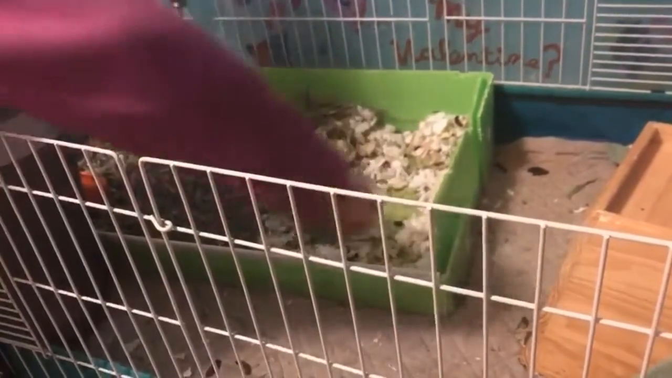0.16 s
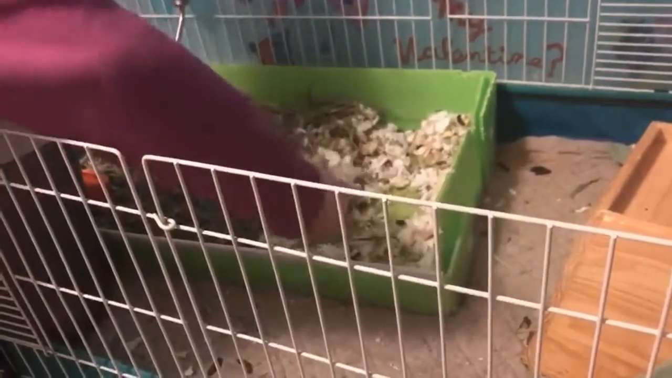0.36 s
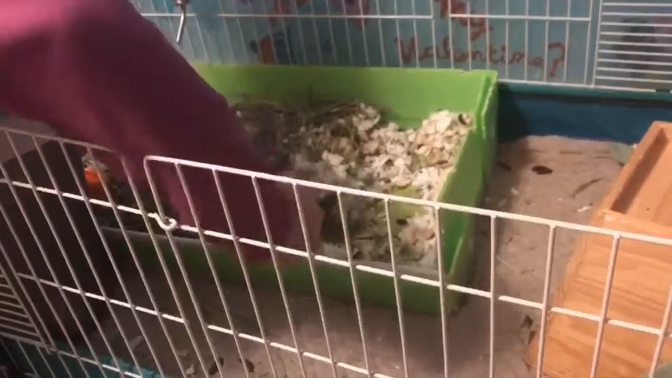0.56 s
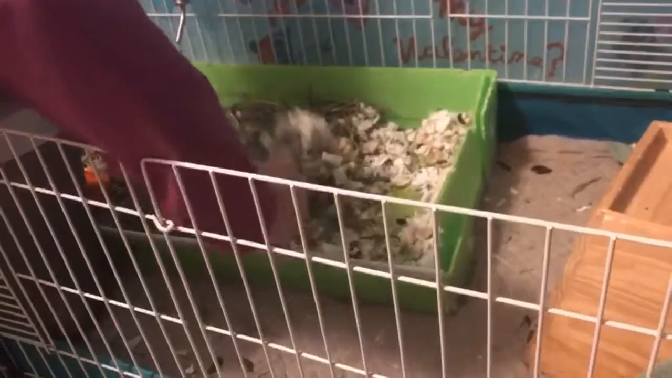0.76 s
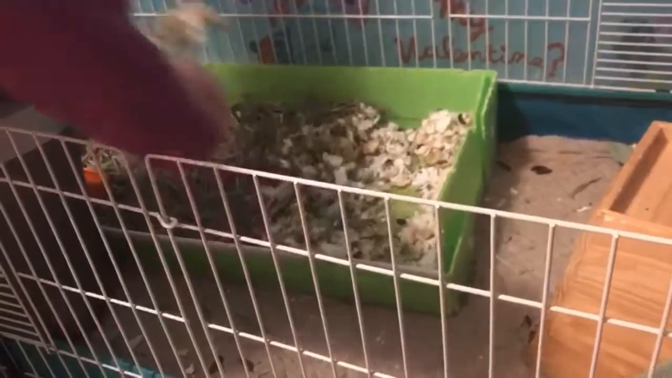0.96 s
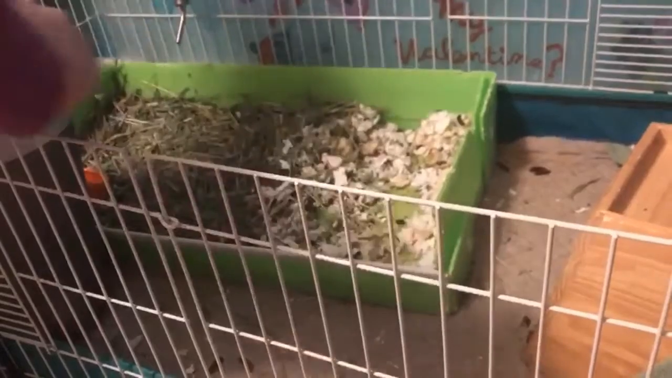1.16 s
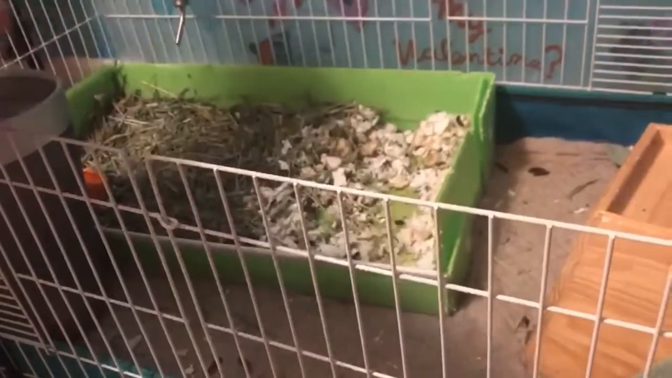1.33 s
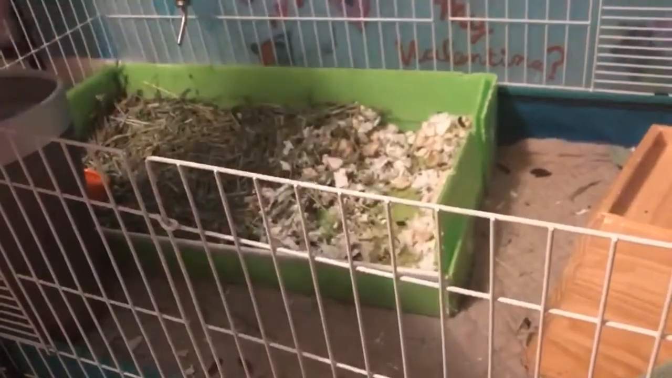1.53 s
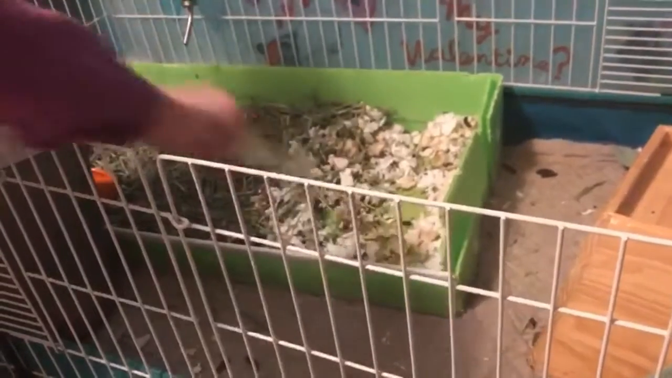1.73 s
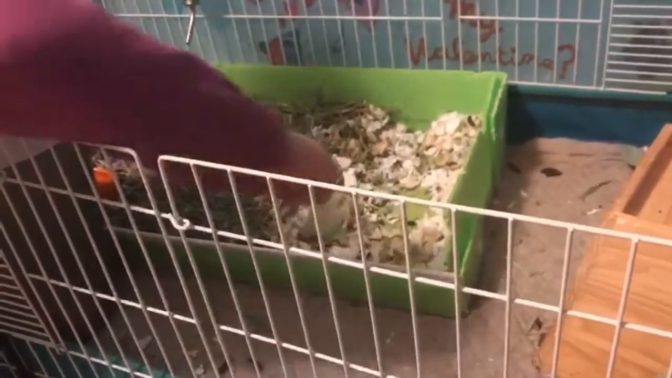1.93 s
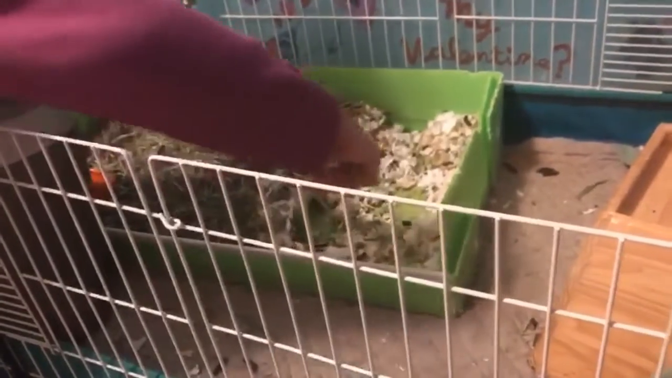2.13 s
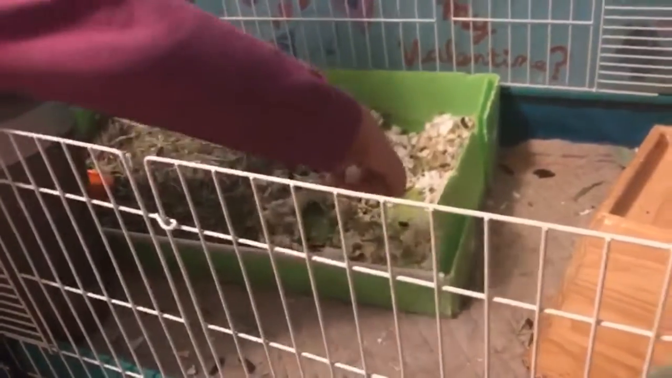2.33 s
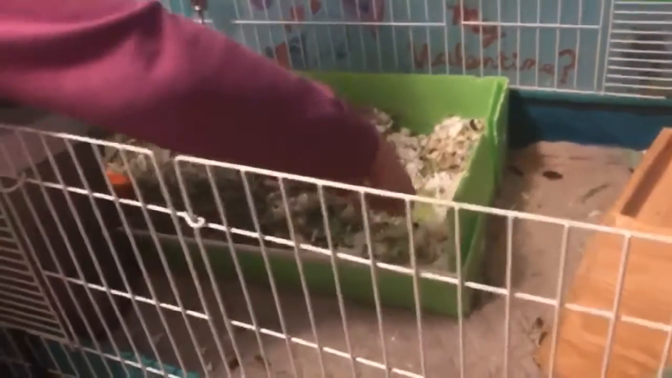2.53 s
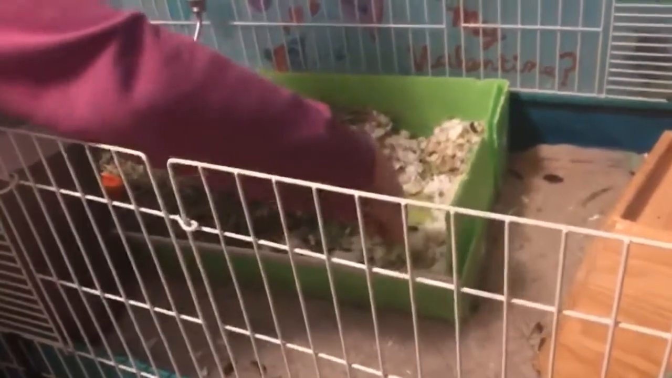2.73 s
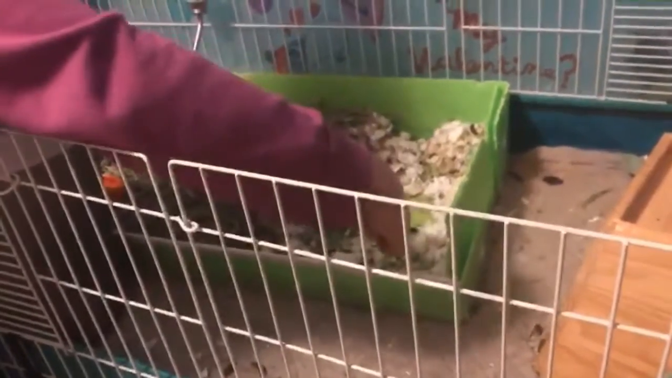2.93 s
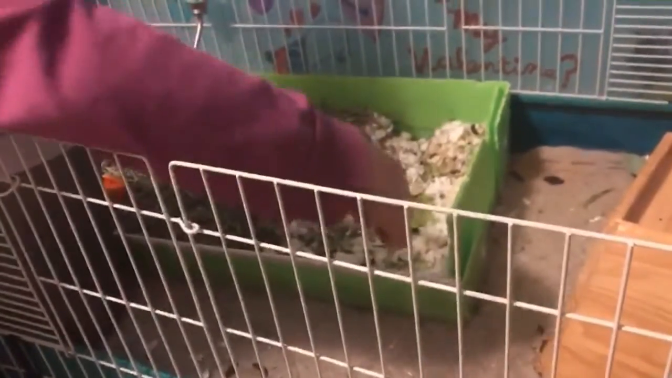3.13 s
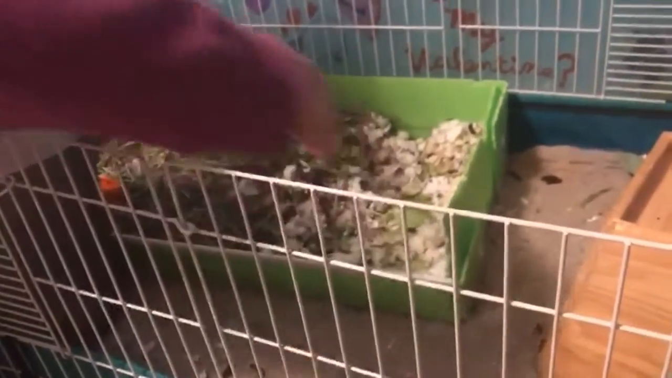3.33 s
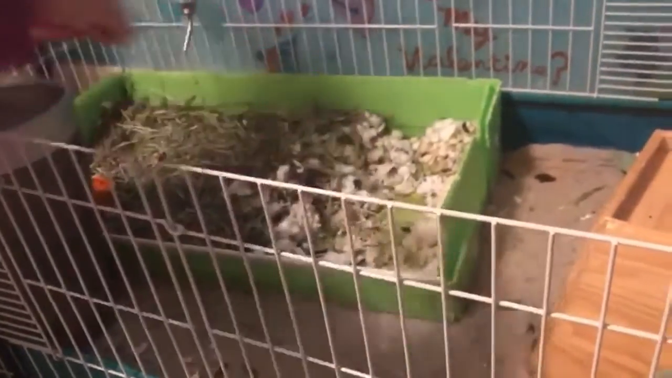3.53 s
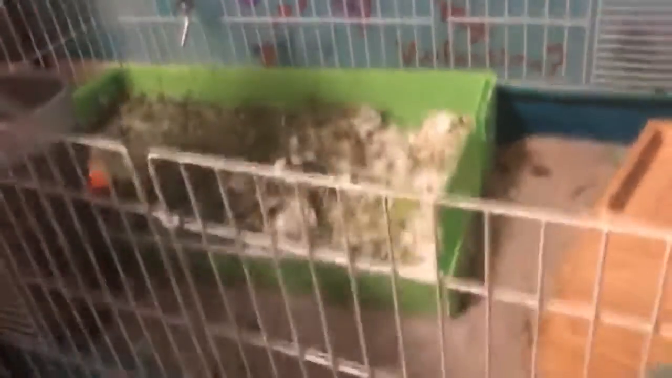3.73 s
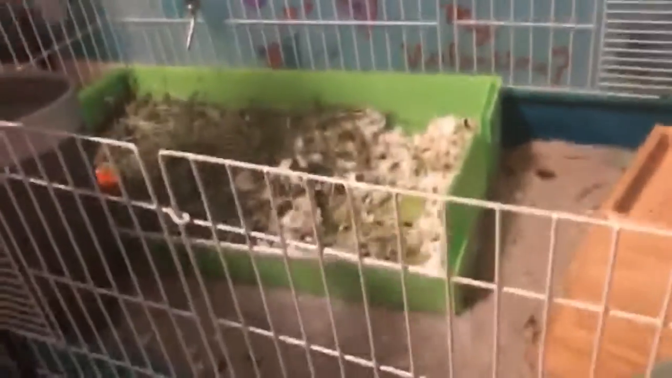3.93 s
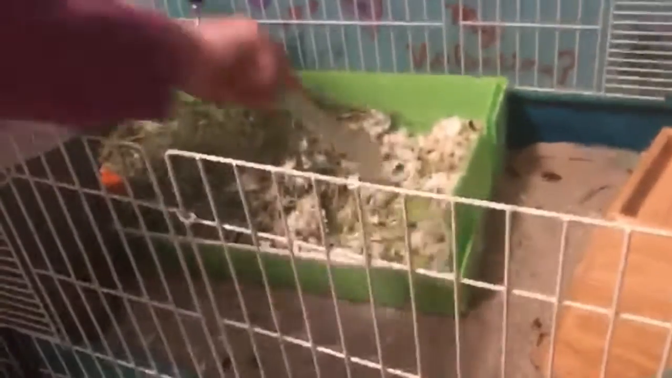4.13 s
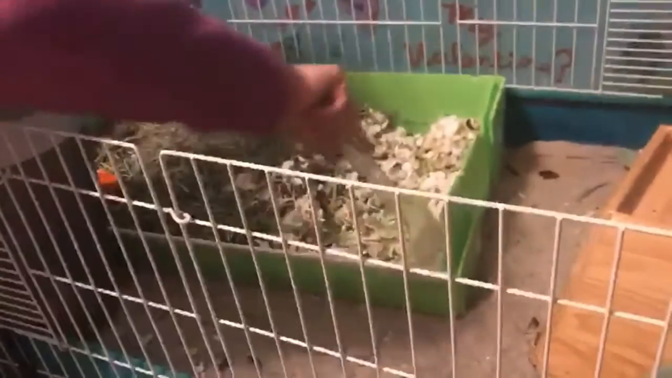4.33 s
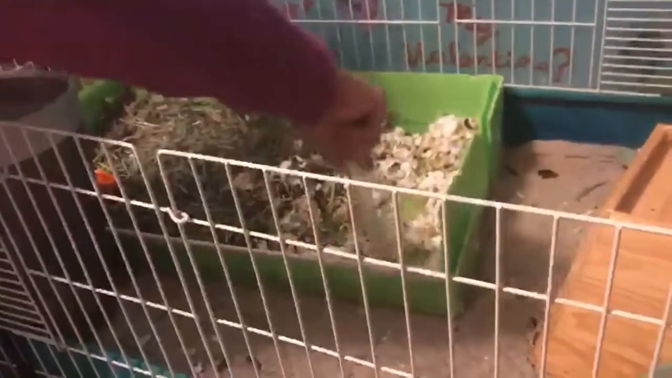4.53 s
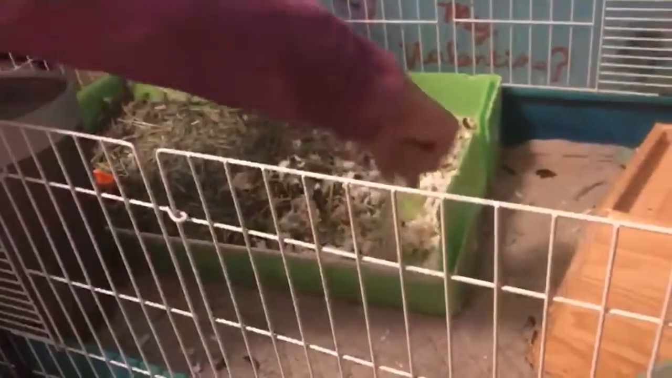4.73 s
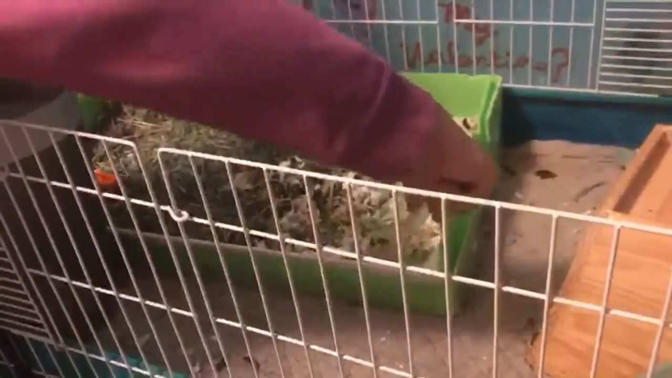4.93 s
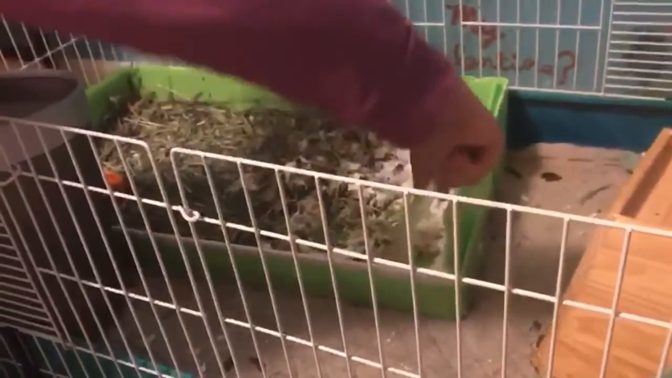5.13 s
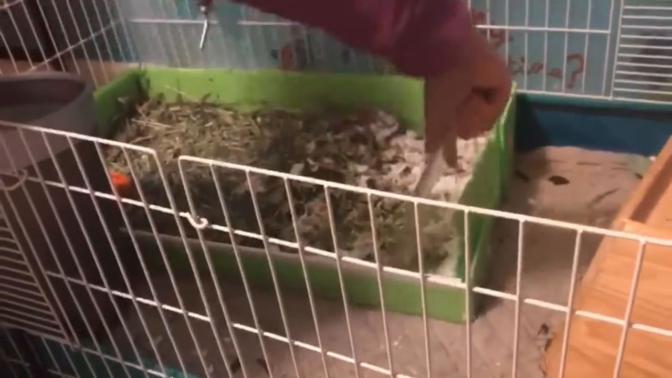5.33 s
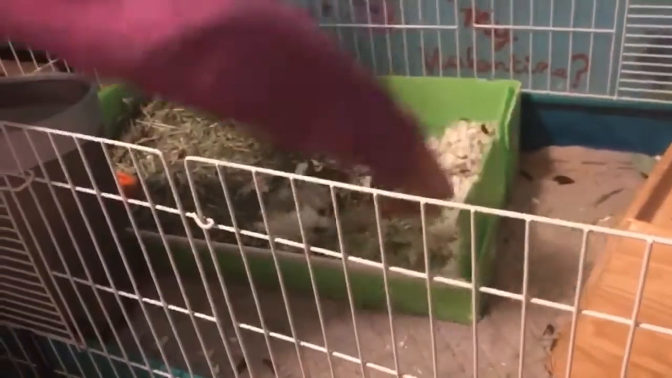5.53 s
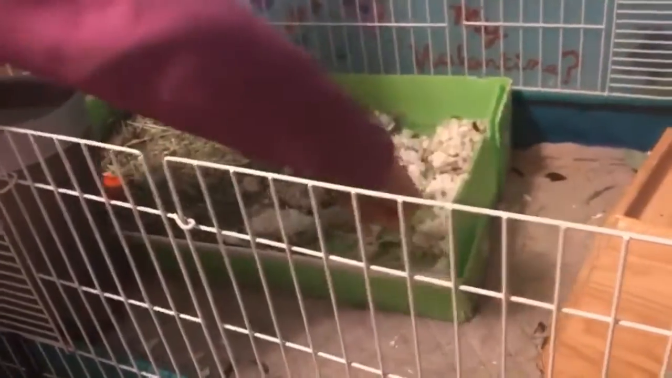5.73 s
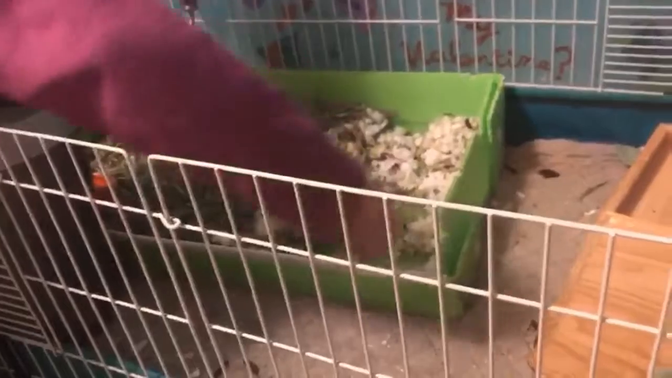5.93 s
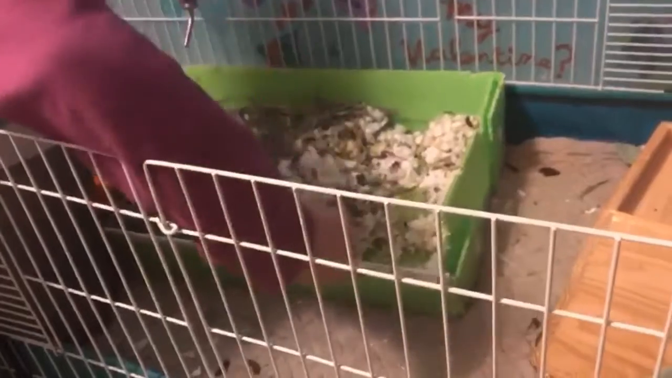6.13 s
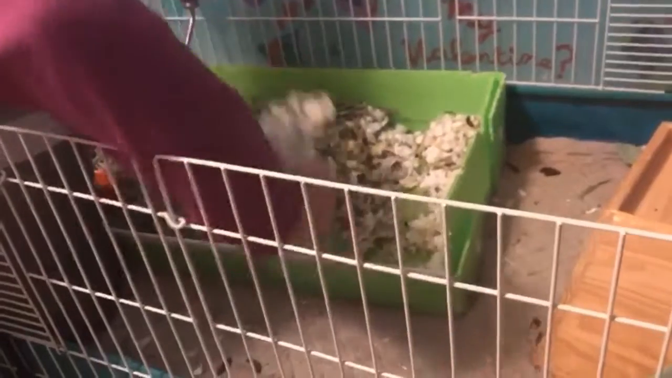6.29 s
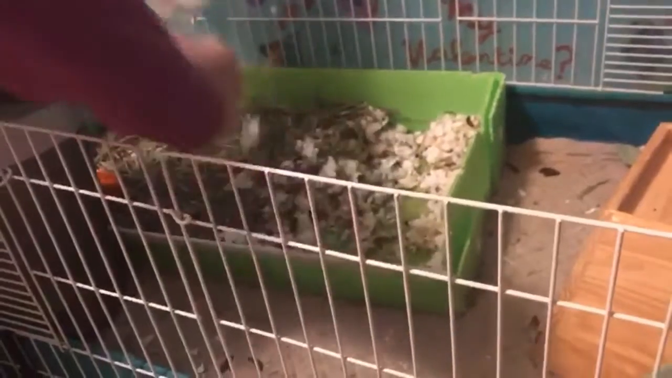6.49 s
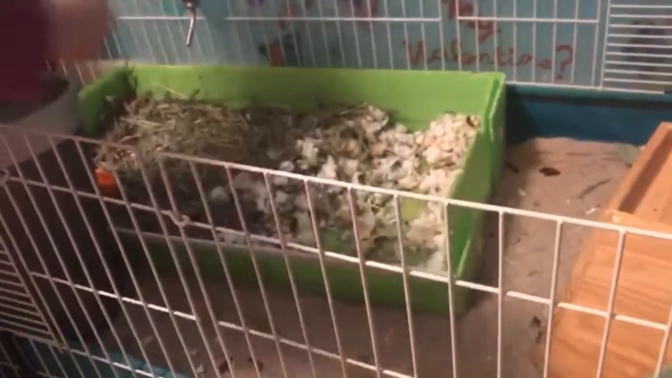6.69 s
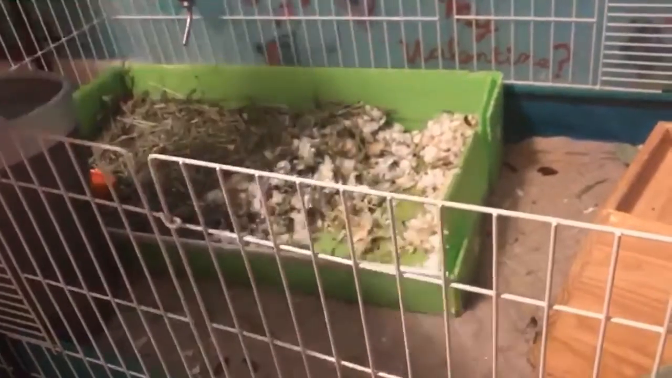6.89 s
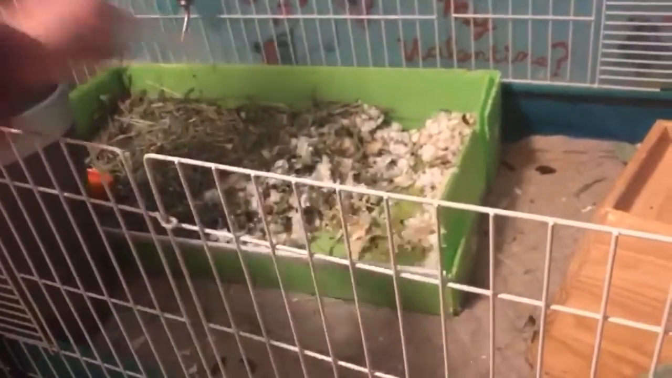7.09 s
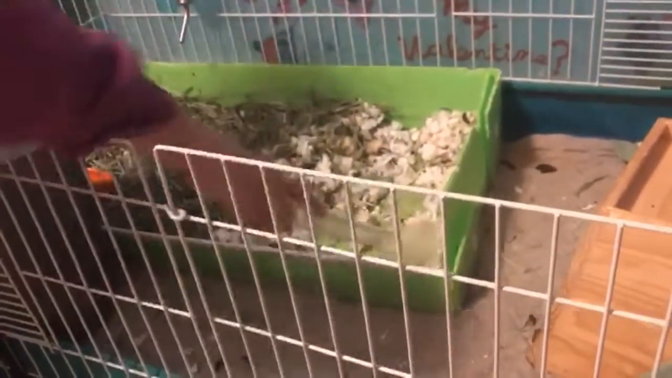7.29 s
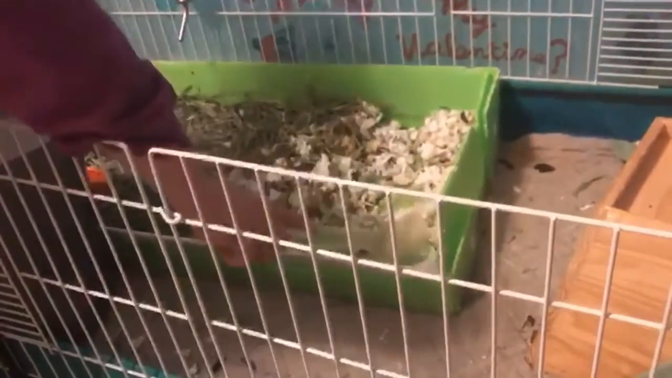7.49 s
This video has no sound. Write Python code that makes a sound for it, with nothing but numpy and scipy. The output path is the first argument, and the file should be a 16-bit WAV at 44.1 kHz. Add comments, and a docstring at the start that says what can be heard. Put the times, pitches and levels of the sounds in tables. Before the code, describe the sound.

Gritty scoops through crunchy pet bedding in a plastic tray alternate with sharp knocks on a hollow can and brief patters of falling shavings.

```python
"""A large spoon scrapes soiled wood shavings out of a plastic litter tray in a pet cage, close by in a small room.
Scraping is filtered grain noise under stroke envelopes; three times the spoon knocks a garbage can's rim (decaying
modes and noise cracks) and shavings patter in (sparse grains). In between it bumps the tray, ticks and crunches.
Thin, faint gliding-tone squeaks sit over a low room hum of filtered noise, all heard by one microphone.
"""
import sys
import numpy as np
from scipy import signal
from scipy.fft import rfft, irfft
from scipy.io import wavfile
from scipy.ndimage import uniform_filter1d

SR = 44100
rng = np.random.default_rng(int(sys.argv[2]) if len(sys.argv) > 2 else 0)


def bounce(signal):
    """Save signal as a 16-bit WAV file at the path given by the first command-line argument."""
    frames = np.transpose(np.atleast_2d(signal))
    limited = np.clip(frames, -1, 1)
    pcm = np.round(limited * 32767).astype(np.int16)
    wavfile.write(sys.argv[1], SR, pcm)


N = 332955
TIME = np.arange(N) / SR
AGE = TIME[:SR // 2]  # time since a blow [s]


def undb(db):
    """Decibels to gain."""
    return 10 ** (np.asarray(db) / 20)


def unit(x):
    """Scale to rms 1."""
    return x / np.sqrt(np.mean(x ** 2))


def punch(x):
    """Scale a blow so that its loudest 4 ms have rms 1."""
    return x / np.sqrt(uniform_filter1d(x ** 2, SR // 250).max())


def add(track, s, x):
    """Mix a sound into the track from time s."""
    i = max(int(s * SR), 0)
    track[i:i + len(x)] += x[:max(N - i, 0)]


def colour(x, spectrum, rings=()):
    """Causal minimum-phase filter through (Hz, dB) points, with resonances (Hz, width Hz, lift dB) on top."""
    size = 8192
    f = np.maximum(np.fft.rfftfreq(size, 1 / SR), 1)
    hz, db = np.transpose(spectrum)
    gain = undb(np.interp(np.log(f), np.log(hz), db))
    for centre, width, lift_db in rings:
        resonance = 1 / (1 + (2 * (f - centre) / width) ** 2)
        gain = gain * (1 + (undb(lift_db) - 1) * resonance)
    # folding the cepstrum onto positive times makes the filter minimum phase
    cepstrum = irfft(np.log(gain))
    cepstrum[1:size // 2] *= 2
    cepstrum[size // 2 + 1:] = 0
    impulse_response = irfft(np.exp(rfft(cepstrum)))
    return signal.fftconvolve(x, impulse_response)[:len(x)]


def fade(t60):
    """Exponential decay after a blow, by 60 dB in t60 seconds."""
    return np.exp(-np.log(1000) * AGE / max(t60, 1e-3))


def walk(rate):
    """Random wander with a spread near 1, joining `rate` random points per second by straight lines."""
    points = rng.standard_normal(N // 100)
    return np.interp(TIME * rate, np.arange(len(points)), points)


def grains(rate, spread_db):
    """Tiny fractures at random moments, a few much larger than the rest; rms 1."""
    happens = rng.random(N) < rate / SR
    strength = rng.standard_normal(N)
    size = undb(spread_db * np.minimum(rng.exponential(size=N), 4))
    return unit(happens * strength * size)


RING_JITTER = .02  # typical share by which a mode's pitch differs from blow to blow


def ring(modes, bass_db, bass_hz, scatter_db):
    """Modes of a struck body; each blow lands elsewhere and weights them anew."""
    out = 0
    chances = rng.standard_normal((len(modes), 2))
    for k, ((hz, db, t60), (level_chance, pitch_chance)) in enumerate(zip(modes, chances)):
        low_boost_db = bass_db / (1 + (hz / bass_hz) ** 4)
        weight = undb(db + scatter_db * level_chance + low_boost_db)
        jittered_hz = hz * (1 + RING_JITTER * pitch_chance)
        sign = (-1) ** k
        out = out + sign * weight * fade(t60) * np.sin(2 * np.pi * jittered_hz * AGE)
    return punch(out)


def crack(spectrum, t60, rings=()):
    """The dense, short-lived modes of a hard contact, as a decaying noise burst."""
    return punch(colour(rng.standard_normal(len(AGE)) * fade(t60), spectrum, rings))


def glide(length, pitches_hz, waver, overtone_db):
    """A short unsteady tone that swells and dies, passing through the given pitches."""
    n = int(length * SR)
    hz = np.interp(np.linspace(0, 1, n), np.linspace(0, 1, len(pitches_hz)), pitches_hz)
    phase = 2 * np.pi * np.cumsum(hz * (1 + waver * walk(220)[:n])) / SR
    swell = np.sqrt(2) * np.sin(np.linspace(0, np.pi, n))
    return swell * (np.sin(phase) + undb(overtone_db) * np.sin(2 * phase))


def flurry(rate, length):
    """One small impact followed by a dying run of smaller ones."""
    hits = (rng.random(len(AGE)) < rate / SR) * rng.standard_normal(len(AGE))
    hits[0] = 2
    one_impact = rng.standard_normal(len(AGE)) * fade(0.0074)
    return signal.fftconvolve(hits * fade(2 * length), one_impact)[:len(AGE)]


STROKE_RANGE_DB = -20  # a swell climbs from this far down, a release falls by as much


def envelope(s, swell, hold, release):
    """Gain of one gesture: it swells, holds and dies away, evenly in dB."""
    before = np.maximum(s - TIME, 0) / max(swell, 1e-3)
    after = np.maximum(TIME - s - hold, 0) / max(release, 1e-3)
    return undb(STROKE_RANGE_DB * np.minimum(before + after, 10))


# colour of the quiet room: (frequency [Hz], relative level [dB])
ROOM_SPECTRUM = [(25, -3.5), (48, -2.5), (70, 1), (134, -6.5), (242, -12.5), (301, -10), (405, -15),
                 (754, -19.5), (1380, -27.5), (3300, -32), (14800, -35.5), (16000, -39.5)]


def room_tone():
    """Low steady noise with a wavering drone from one narrow resonance."""
    drone = (58, 4.4, 13)
    return unit(colour(rng.standard_normal(N), ROOM_SPECTRUM, [drone])) * undb(-63)


# standing waves of the room: (frequency [Hz], width [Hz], level before the wet level [dB])
STANDING_WAVES = [(89, 4, 22.5), (162, 14, 11.5)]


def reverberation(x, t60_low, t60_high, split_hz, wet_db):
    """A small furnished room: the tail builds within milliseconds, its treble dies first, standing waves boom on."""
    noise = rng.standard_normal(len(AGE))
    low = signal.sosfilt(signal.butter(1, split_hz, fs=SR, output="sos"), noise)
    build_up = 1 - fade(0.011)
    tail = (low * fade(t60_low) + (noise - low) * fade(t60_high)) * build_up
    diffuse = signal.fftconvolve(x, tail / np.linalg.norm(tail))[:N]
    boom = 0
    for hz, width, db in STANDING_WAVES:
        boom = boom + undb(db) * signal.lfilter(*signal.iirpeak(hz, hz / width, fs=SR), x)
    return undb(wet_db) * (diffuse + boom)


# thin squeaks: (time [s], length [s], start [Hz], middle [Hz], end [Hz], level about which it wanders [dB])
SQUEAK_CALLS = [(1.145, .055, 1050, 1065, 1090, -70), (1.205, .11, 1090, 1190, 1240, -76),
                (2.94, .11, 800, 765, 755, -72), (6.105, .055, 740, 880, 1230, -66),
                (6.33, .06, 770, 900, 920, -68), (6.41, .08, 770, 760, 765, -70),
                (6.57, .15, 660, 610, 740, -71), (6.675, .065, 1060, 1020, 910, -67),
                (6.955, .08, 640, 640, 790, -68)]


def squeaks():
    """Faint, nearly pure gliding tones with a weak octave overtone and an unsteady level."""
    out = np.zeros(N)
    for s, length, start_hz, middle_hz, end_hz, db in SQUEAK_CALLS:
        pitches_hz = (start_hz, middle_hz, end_hz)
        add(out, s, undb(db) * glide(length, pitches_hz, waver=0.013, overtone_db=-20.5))
    return out * undb(3.5 * walk(70))


# soft low bumps and booms: (time [s], level before a common trim [dB], pitch [Hz])
LOW_BUMPS = [(0.079, -42.5, 154), (0.123, -42, 165), (1.802, -41, 94), (1.836, -46, 95),
             (1.977, -51.5, 205), (2.125, -50.5, 167), (3.575, -44.5, 175.6), (3.624, -49, 280),
             (3.707, -35, 108), (3.802, -44, 180), (3.96, -47, 162), (4.504, -41, 95), (5.155, -57, 286),
             (5.282, -53, 312), (5.49, -35.5, 195), (7.234, -51.5, 150), (7.331, -46, 89)]


def bumps():
    """Dull low bumps and booms after knocks: a broad low resonance with a soft onset."""
    out = np.zeros(N)
    for s, db, hz in LOW_BUMPS:
        soft_onset = 1 - fade(0.0064)
        burst = rng.standard_normal(len(AGE)) * fade(0.13) * soft_onset
        dull = [(hz / 4, -30), (hz / 2, -2), (hz, 0), (hz * 2, -5), (hz * 8, -38), (hz * 32, -70)]
        add(out, s, undb(db - 2.5) * punch(colour(burst, dull)))
    return out


# light clicks of spoon and cage: (time [s], level [dB], bass before a common trim [dB], treble [dB]);
# bass and treble are relative to the rattle
LIGHT_CLICKS = [(0.374, -55.5, -5, -10), (0.554, -61, 3, 9), (1.1061, -44.5, -16, -24),
                (2.866, -57, -11.5, -9), (3.2278, -35.5, -10.5, -11.5), (5.577, -45.5, -8, -16),
                (5.79, -65, 4, 12), (5.932, -48.5, -33, -20), (6.048, -42.5, -10, -11.5),
                (6.4, -59.5, -4.5, 0.5), (6.8792, -46, -29, 6.5), (6.8855, -47.5, -31, 12.5),
                (7.127, -54.5, -21, -6.5), (7.219, -45, -17, -7.5), (7.2906, -34.5, -5, -20),
                (7.404, -59, -19, 3), (7.459, -58, -16, -3)]
# a dry rattle: (frequency [Hz], relative level [dB])
RATTLE_SPECTRUM = [(200, -28.5), (700, 3.5), (1400, 3), (3400, -0.5), (4800, -5.5), (6500, -18),
                   (16000, -37)]
# bright edge of a hard contact: (frequency [Hz], relative level [dB])
CRACK_SPECTRUM = [(1500, -20), (2800, 7), (3800, -3), (6000, 4), (9800, 2.5), (12000, -2.5), (16000, -4)]
# modes of the plastic tray: (frequency [Hz], relative level [dB], t60 [s])
TRAY_RESONANCES = [(161.3, -15, 0.068), (205.3, -13.5, 0.067), (310, -2.5, 0.108), (365.6, -1.5, 0.053),
                   (517, -9, 0.062), (720, 6, 0.036), (914, -2.5, 0.019), (1189, 0.5, 0.03),
                   (1505, -3, 0.034), (1740, -3.5, 0.022), (2054, -11.5, 0.06)]


def clicks():
    """Small dry contacts: a dense rattle, a bright edge and a little thud of the tray modes."""
    out = np.zeros(N)
    for s, db, bass_db, treble_db in LIGHT_CLICKS:
        rattle = crack(RATTLE_SPECTRUM, t60=0.0394)
        thud = ring(TRAY_RESONANCES, bass_db=6.5, bass_hz=675, scatter_db=4.0)
        edge = crack(CRACK_SPECTRUM, t60=0.03)
        add(out, s, undb(db) * (rattle + undb(treble_db) * edge + undb(bass_db + 3.5) * thud))
    return out


# spoon bumping the tray: (time [s], level before the thud's trim [dB], bass lift [dB],
# contact crack relative to that level [dB])
TRAY_BLOWS = [(0.0992, -54, 3, 10.5), (1.757, -59, -9, 9.5), (1.7895, -50, -9, 2),
              (2.477, -53.5, 16, -28.5), (2.548, -50, 20, -8), (4.2741, -39, -5, -8.5),
              (4.4867, -31, 4.5, -5), (5.417, -56.5, -8, 4.5), (5.444, -36, 17, -17),
              (5.5345, -45.5, -41, 8.5), (5.855, -47.5, 2, -12), (7.2902, -25.5, 6, 2),
              (7.318, -40.5, -22, -15)]
# the spoon's own ring: (frequency [Hz], width [Hz], level over its broad response [dB])
SPOON_RESONANCES = [(3820, 160, 9), (4260, 83, 2), (6434, 91, 10), (8010, 196, 10), (9600, 580, 5.5)]


def tray_knocks():
    """The tray thuds with its own modes just after the spoon cracks and rings briefly."""
    out = np.zeros(N)
    for s, db, bass_db, crack_db in TRAY_BLOWS:
        contact = crack(CRACK_SPECTRUM, t60=0.017, rings=SPOON_RESONANCES)
        thud = ring(TRAY_RESONANCES, bass_db, bass_hz=430, scatter_db=4.5)
        add(out, s, undb(db + crack_db) * contact)
        add(out, s + 0.000908, undb(db - 2.0) * thud)
    return out


# spoon on the rim of the can: (time [s], level [dB], bass lift [dB],
# contact crack relative to that level, before a common trim [dB], lift of the highest treble [dB])
RIM_BLOWS = [(1.3229, -15, -0.5, -0.5, -3.5), (3.686, -20.5, -10.5, 0.5, 16.5),
             (3.7469, -36.5, -8.5, -11, 7), (6.8163, -25.5, -8, -11.5, 0), (6.842, -34.5, 10, -26, 0.5),
             (6.848, -38, 8.5, -9, 6), (6.9026, -39, -46, -12, 0)]
# crack of the rim: (frequency [Hz], relative level [dB])
RIM_CRACK_SPECTRUM = [(1500, -38.5), (2800, -7), (3500, -4.5), (6000, 0), (7200, -1.5), (9800, -5.5),
                      (12500, -20), (16000, -22)]
# modes of the can's wall: (frequency [Hz], relative level [dB], t60 [s])
CAN_RESONANCES = [(91, -30.5, 0.17), (285, -11.5, 0.075), (550, -18, 0.098), (716, -8.5, 0.077),
                  (1050, -5, 0.026), (1130, -1.5, 0.034), (1380, -6, 0.027), (1554, -0.5, 0.013),
                  (1680, 3, 0.027), (1982, -8.5, 0.016), (2156, -10, 0.047), (2475, -12.5, 0.05),
                  (2504, -14, 0.071)]


def can_knocks():
    """The rim cracks first; the wall of the can answers a moment later with its modes and a dense rattle."""
    out = np.zeros(N)
    for s, db, bass_db, crack_db, top_db in RIM_BLOWS:
        rim = crack(RIM_CRACK_SPECTRUM, t60=0.026, rings=[(14700, 4900, top_db)])
        add(out, s, undb(db + crack_db - 2.5) * rim)
        wall = ring(CAN_RESONANCES, bass_db, bass_hz=910, scatter_db=-0.5)
        wall = wall + undb(-7) * crack(RATTLE_SPECTRUM, t60=.035)
        add(out, s + 0.001, undb(db) * wall)
    return out


# clumps of shavings sliding off into the can: (time when thickest [s], swell [s], release [s], level [dB])
SHAVING_POURS = [(1.343, 0.048, 0.085, -49.5), (1.388, 0.026, 0.093, -53.5), (3.71, 0.091, .11, -46.5),
                 (6.828, 0.017, .1, -46.5), (6.9, .032, 0.24, -63)]
# shavings pattering in the hollow can: (frequency [Hz], relative level [dB])
POUR_SPECTRUM = [(120, -31.5), (200, 2.5), (409, -7.5), (709, -5.5), (899, -18.5), (1120, -8.5),
                 (1270, -16), (1680, -9.5), (1870, -15.5), (2510, -9.5), (3020, -19), (4770, -21),
                 (9750, -24), (16000, -36.5)]
# heavier bits landing in the can: (time [s], level [dB])
HEAVY_BITS = [(1.377, -48), (1.399, -45), (1.414, -42.5), (3.774, -52), (6.909, -47.5)]
# colour of those bits: (frequency [Hz], relative level [dB])
HEAVY_BIT_SPECTRUM = [(300, -14.5), (1100, -11), (1700, -2), (2600, -1.5), (3600, -11), (6000, -18),
                      (16000, -18)]
STRAGGLERS_DB, STRAGGLERS_RELEASE_S = -23.5, 0.16  # the last crumbs, relative to the bulk


def pouring():
    """Loose shavings patter into the hollow can as sparse grains, with a few stragglers and heavier bits."""
    patter = grains(rate=1500, spread_db=2.5)
    flow = 0
    for s, swell, release, db in SHAVING_POURS:
        bulk = envelope(s, swell, 0, release)
        stragglers = undb(STRAGGLERS_DB) * envelope(s, swell, 0, STRAGGLERS_RELEASE_S)
        flow = flow + undb(db) * (bulk + stragglers)
    out = unit(colour(patter, POUR_SPECTRUM)) * flow
    for s, db in HEAVY_BITS:
        bit = flurry(rate=2000, length=0.049)
        add(out, s, undb(db) * punch(colour(bit, HEAVY_BIT_SPECTRUM)))
    return out


# shavings giving way in a quick run of snaps: (time [s], length [s], level [dB], tray thud relative to it [dB])
SHAVING_CRUNCHES = [(1.8454, 0.056, -55, 7), (1.8824, 0.036, -49.5, -4), (1.9819, 0.069, -53, 2),
                    (2.4772, .04, -55.5, 10), (2.551, 0.086, -54, -5), (2.766, 0.074, -61, -19),
                    (2.838, .03, -69, -15), (4.8353, 0.041, -57, -3.5), (4.876, 0.037, -55, -5.5),
                    (5.083, 0.046, -57.5, 1.5), (5.492, 0.036, -48.5, -9), (5.596, 0.042, -47.5, -4.5),
                    (5.755, 0.1, -62, 5), (6.009, 0.033, -63, -7)]
# snapping shavings: (frequency [Hz], relative level [dB])
SNAP_SPECTRUM = [(200, 6), (700, 12.5), (1500, 3.5), (3000, 1), (6000, -5), (10000, -7.5), (16000, -14)]
# rumble of the tray: (frequency [Hz], relative level [dB])
RUMBLE_SPECTRUM = [(45, -24), (85, -5.5), (130, -0.5), (200, 1.5), (330, -4), (450, -3.5), (700, -13),
                   (1400, -35.5)]


def crunches():
    """Packed shavings break under the spoon in a dying run of snaps and jolt the tray."""
    out = np.zeros(N)
    for s, length, db, thud_db in SHAVING_CRUNCHES:
        snaps = flurry(rate=1100, length=length)
        crunch = punch(colour(snaps, SNAP_SPECTRUM))
        thud = punch(colour(snaps, RUMBLE_SPECTRUM))
        add(out, s, undb(db) * (crunch + undb(thud_db) * thud))
    return out


def wall_reflection(x, lag_s, sway, share):
    """Add the bounce off a tray wall; its comb shifts as the spoon moves."""
    lag = lag_s * (1 + sway * walk(rate=5))
    return x + share * np.interp(TIME - lag, TIME, x)


# as the contact moves along the spoon's edge: level wander, share of pitch drift, rate of both
RING_WANDER_DB, RING_DRIFT, RING_RATE_HZ = 3, .01, 22


def shifting_rings(x, rings):
    """Add resonances that each drift in pitch and come and go on their own."""
    out = x
    for hz, width, lift_db in rings:
        drifting_hz = hz * (1 + RING_DRIFT * walk(RING_RATE_HZ))
        turn = np.exp(2j * np.pi * np.cumsum(drifting_hz) / SR)
        pole = np.exp(-np.pi * width / SR)
        # shift the resonance to 0 Hz, smooth there and shift back
        smoothed = signal.lfilter([1 - pole], [1, -pole], x / turn)
        band = 2 * (smoothed * turn).real
        out = out + band * (undb(lift_db + RING_WANDER_DB * walk(RING_RATE_HZ)) - 1)
    return out


# strokes of the spoon through the litter, levels before each layer's trim:
# (time of full pressure [s], swell [s], hold [s], release [s], edge hiss [dB], shavings crunch [dB],
# tray rumble [dB], spoon loaded [0 or 1])
SPOON_STROKES = [(0.101, 0.15, 0.1, 0.16, -51.5, -54.5, -57.5, 1),
                 (0.46, 0.29, 0.16, 0.11, -66.5, -73.5, -73, 1),
                 (0.744, 0.14, 0.0032, 0.088, -60, -62.5, -66, 1),
                 (1.787, 0.016, 0.0044, 0.046, -44, -53, -60, 0),
                 (1.889, 0.12, 0.19, 0.17, -56.5, -60, -60.5, 0),
                 (2.296, 0.19, 0.0016, 0.22, -67.5, -68.5, -65.5, 0),
                 (2.483, 0.12, 0.017, 0.15, -63.5, -62, -53.5, 1),
                 (2.655, 0.3, 0.33, 0.12, -64, -68, -81.5, 1),
                 (4.28, 0.021, 0.022, 0.015, -47.5, -56.5, -44, 0),
                 (4.375, 0.0082, 0, .03, -54, -60, -57, 0), (4.393, .012, 0.058, 0.033, -44, -53, -61, 0),
                 (4.423, 0.04, 0.071, 0.049, -39.5, -49, -53.5, 0),
                 (4.782, 0.044, 0, 0.027, -52.5, -64.5, -56, 0),
                 (4.849, 0.021, 0.036, 0.019, -66, -66.5, -56, 0),
                 (5.201, 0.0085, 0.0083, 0.016, -50, -58.5, -57, 0),
                 (5.296, 0.15, 0.016, 0.08, -78, -71, -57.5, 0),
                 (5.441, 0.031, 0.076, 0.09, -50.5, -48.5, -42.5, 1),
                 (5.494, 0.052, 0.042, 0.19, -40, -50, -62, 1), (5.868, 0.028, 0, 0.084, -61, -52, -50, 1),
                 (6.05, 0.14, 0, 0.094, -76, -57.5, -56.5, 1),
                 (6.247, 0.029, 0.024, 0.086, -60, -62, -65, 1), (6.639, .03, 0, .05, -62, -73, -68.5, 1),
                 (7.239, 0.15, 0.018, 0.092, -64.5, -61, -57, 0),
                 (7.3, 0.031, 0.05, 0.2, -55, -52.5, -46, 0),
                 (7.405, .02, 0.026, 0.018, -47.5, -58, -59, 0),
                 (7.543, 0.039, 0.29, .1, -48, -52, -48.5, 0)]
# the hand rests in the tray and stirs the litter: (start [s], end [s], crunch before trim and wander [dB])
HAND_STIRS = [(0, 0.397, -70.5), (0.93, 1.098, -72.5), (4.652, 5.337, -70.5), (5.696, 6.438, -67),
              (6.532, 6.76, -72)]
STIR_EDGE_S, STIR_HISS_DB, STIR_RUMBLE_DB = 0.035, -6, -1  # hiss and rumble gains relative to the crunch's
STIR_WANDER_DB, STIR_RATE_HZ = 5, 13


def effort():
    """Gains over time from strokes and stirring: hiss of the empty and of the loaded spoon, crunch, rumble."""
    stir = 0
    for start, end, db in HAND_STIRS:
        stir = stir + undb(db) * envelope(start, STIR_EDGE_S, end - start, STIR_EDGE_S)
    stir = stir * undb(STIR_WANDER_DB * walk(STIR_RATE_HZ))
    empty = 0
    loaded = stir * undb(STIR_HISS_DB)
    crush = stir
    push = stir * undb(STIR_RUMBLE_DB)
    # overlapping gestures do not add up: the strongest one counts
    for s, swell, hold, release, hiss_db, crunch_db, rumble_db, is_loaded in SPOON_STROKES:
        pressure = envelope(s, swell, hold, release)
        if is_loaded > .5:
            loaded = np.maximum(loaded, undb(hiss_db) * pressure)
        else:
            empty = np.maximum(empty, undb(hiss_db) * pressure)
        crush = np.maximum(crush, undb(crunch_db) * pressure)
        push = np.maximum(push, undb(rumble_db) * pressure)
    return empty, loaded, crush, push


# the spoon's edge on plastic: (frequency [Hz], relative level [dB])
HISS_SPECTRUM = [(1760, -16.5), (3000, -7), (5070, -6), (6350, -1), (7100, -4), (14800, -5.5),
                 (16000, -3.5)]
# a loaded spoon is damped to one broad resonance: (frequency [Hz], width [Hz], level over its broad response [dB])
LOADED_RESONANCE = [(8100, 5700, 3)]
# crushed shavings: (frequency [Hz], relative level [dB])
CRUNCH_SPECTRUM = [(250, -22.5), (500, -0.5), (800, -1), (1200, -2), (2200, -6), (4000, -14), (6000, -19),
                   (10000, -81)]
# the spoon catches and judders or squeals on the tray floor:
# (time [s], length [s], start [Hz], end [Hz], level before trim and roughness [dB])
SPOON_JUDDERS = [(0.099, .012, 10500, 10000, -39), (2.975, .022, 3800, 3800, -63),
                 (5.416, .032, 510, 495, -36), (7.25, .008, 7600, 7400, -53), (7.428, .022, 850, 800, -49),
                 (7.525, .025, 750, 620, -50)]
JUDDER_WAVER_HZ, JUDDER_ROUGH_DB = 60, 3.5  # stick and slip come unevenly


def digging():
    """The spoon's edge hisses over the plastic, shavings crush and snap, and the tray rumbles under both."""
    empty, loaded, crush, push = effort()
    slips = undb(2 * walk(90))
    friction = grains(rate=12000, spread_db=0.0)
    # the empty spoon rings freely, litter damps the loaded one
    free_hiss = unit(shifting_rings(colour(friction, HISS_SPECTRUM), SPOON_RESONANCES))
    damped_hiss = unit(colour(friction, HISS_SPECTRUM, LOADED_RESONANCE))
    hiss = free_hiss * empty * undb(-4.0) + damped_hiss * loaded * undb(-3.5)
    crunch = unit(colour(grains(rate=1300, spread_db=0.5), CRUNCH_SPECTRUM)) * undb(-4.0)
    snaps = unit(colour(grains(rate=250, spread_db=2), RATTLE_SPECTRUM)) * undb(-10)
    rumble = unit(colour(grains(rate=1400, spread_db=4.5), RUMBLE_SPECTRUM)) * undb(-2.5)
    rustle = wall_reflection(hiss + (crunch + snaps) * crush, lag_s=.0018, sway=.2, share=.5)
    scrape = slips * (rustle + rumble * push)
    for s, length, start_hz, end_hz, db in SPOON_JUDDERS:
        squeal = glide(length, (start_hz, end_hz), waver=JUDDER_WAVER_HZ / start_hz, overtone_db=-13)
        roughness_db = JUDDER_ROUGH_DB * walk(400)[:len(squeal)]
        add(scrape, s, undb(db - 1 + roughness_db) * squeal)
    return scrape


def scene():
    """All sources in the room, direct and reverberant, at one microphone."""
    dry = squeaks() + bumps() + clicks() + tray_knocks() + can_knocks() + pouring() + crunches() + digging()
    wet = reverberation(dry, t60_low=0.23, t60_high=0.12, split_hz=2300, wet_db=-11.0)
    return (dry + wet + room_tone())[None]


def record(dry):
    """The recorder cuts the deepest bass below 44 Hz and the top above 15.9 kHz."""
    rumble_free = signal.sosfilt(signal.butter(6, 44, "high", fs=SR, output="sos"), dry)
    return signal.sosfilt(signal.ellip(10, .2, 70, 15900, fs=SR, output="sos"), rumble_free)


dry = scene()
out = record(dry)
bounce(out)
```